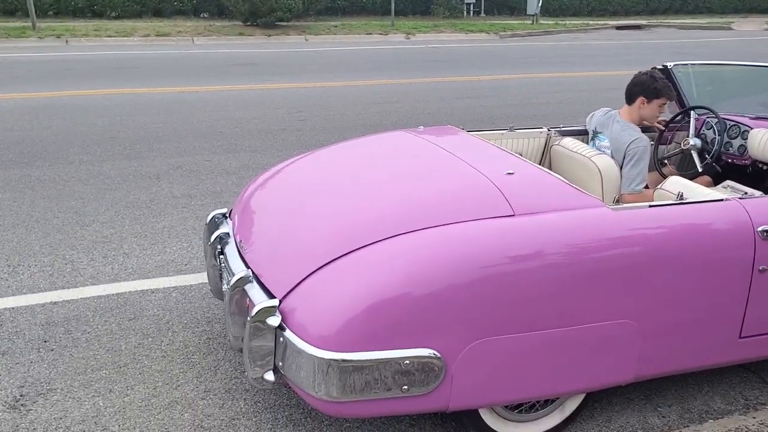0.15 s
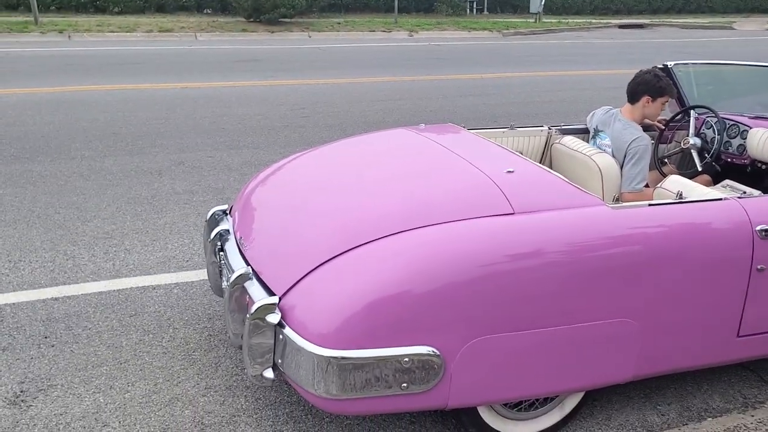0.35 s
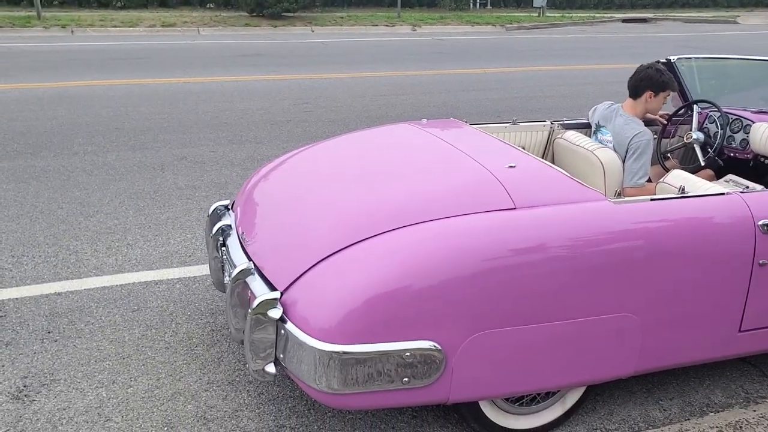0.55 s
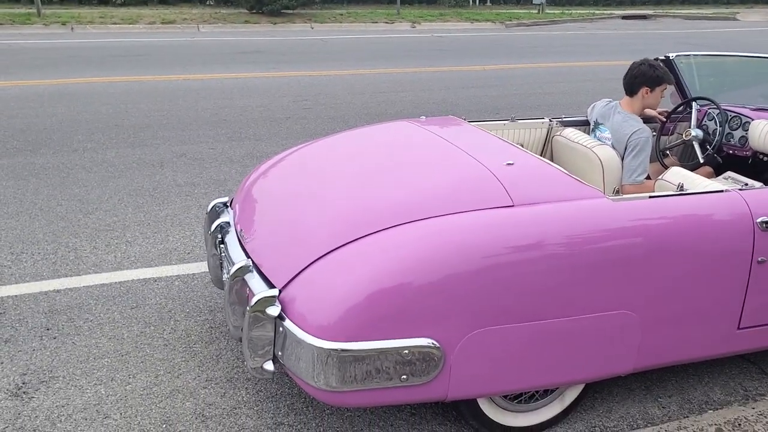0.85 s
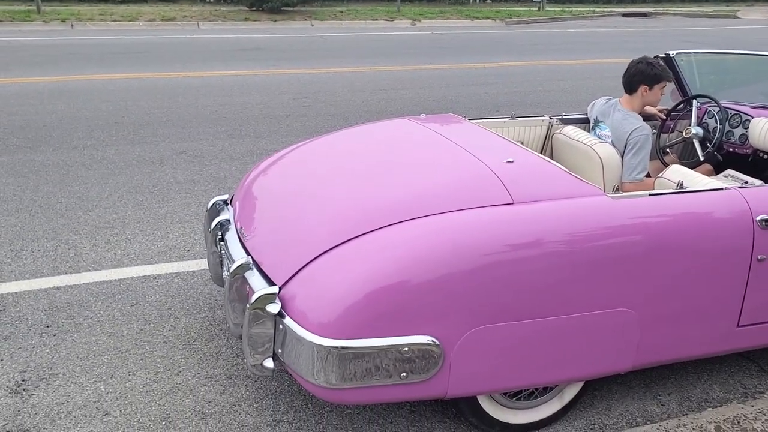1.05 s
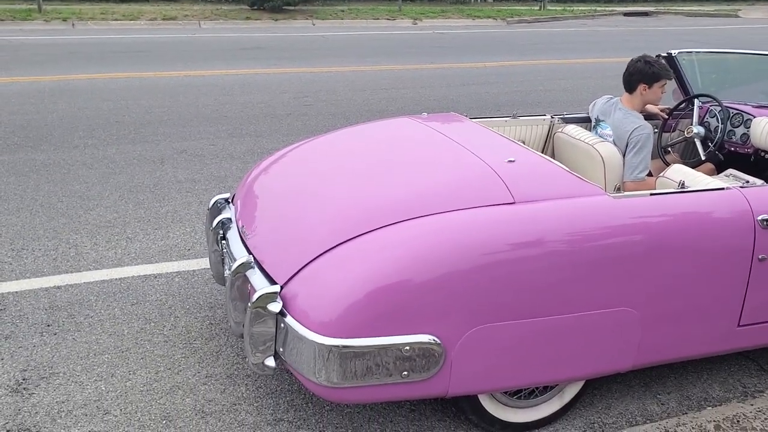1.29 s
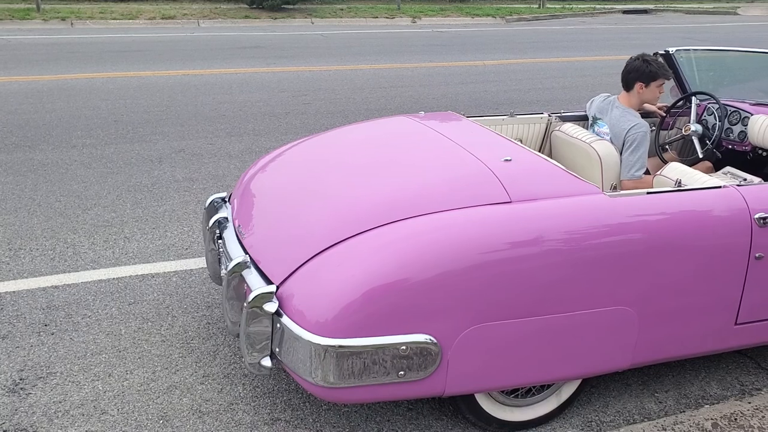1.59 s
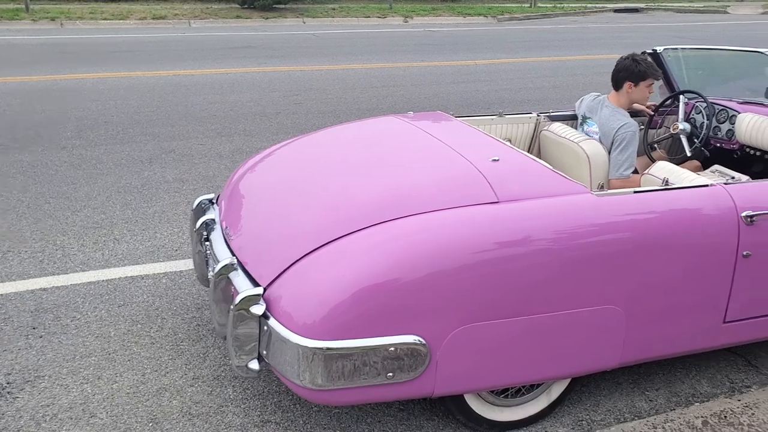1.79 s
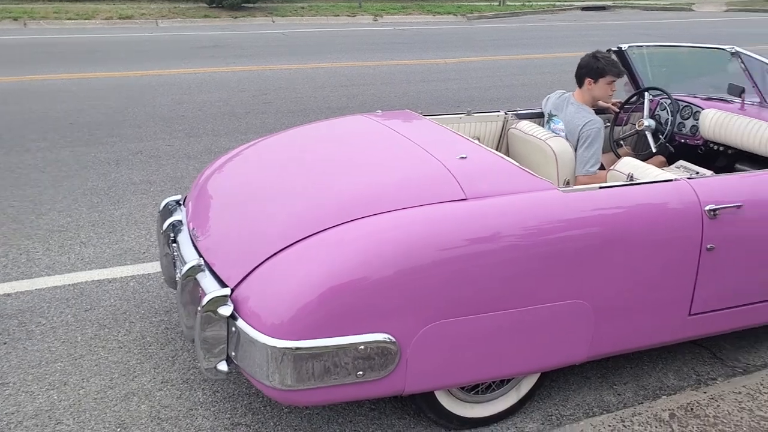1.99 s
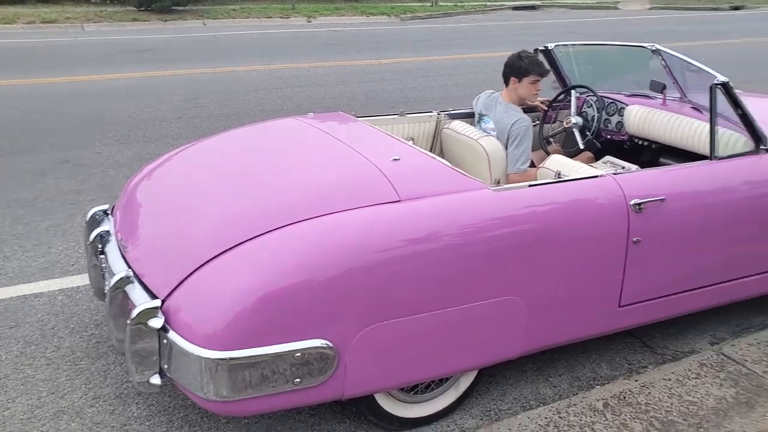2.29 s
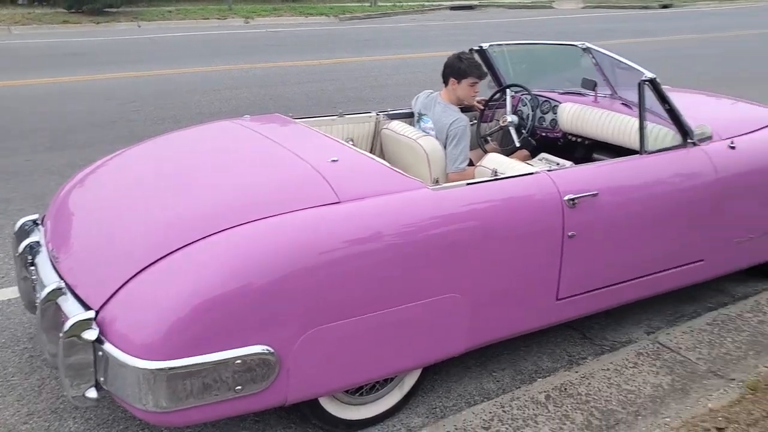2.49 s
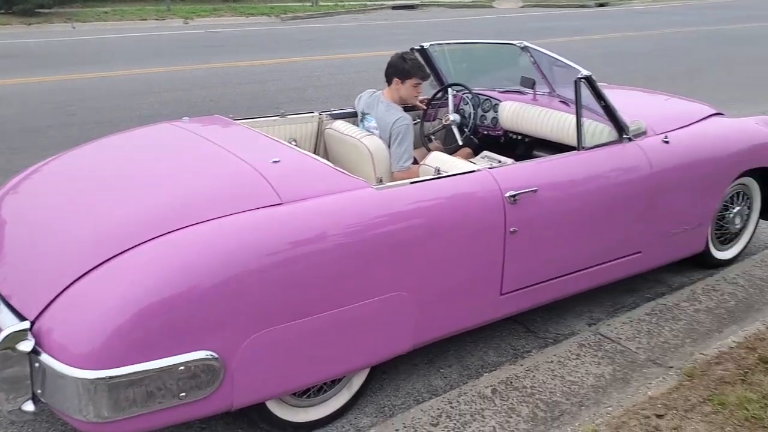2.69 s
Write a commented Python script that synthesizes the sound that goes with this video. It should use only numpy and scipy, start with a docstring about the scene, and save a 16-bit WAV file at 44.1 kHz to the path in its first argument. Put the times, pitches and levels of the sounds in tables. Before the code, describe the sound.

A parked classic car's V8 engine holds a rev, sinks to a lumpy idle, then gives two quick blips with raspy exhaust and faint pops. Heard from beside the rear wheel at a roadside, over soft traffic noise.

```python
"""A parked V8 blipped three times at a roadside, heard from behind the rear wheel.
Each bank of four fires unevenly into its own pipe: thumps, burbling gas and a tone at the firing rate.
A rasp of gas follows each thump, mostly from the near pipe, and rings the tailpipe; lone pops sound
off the throttle. Road noise lies underneath and swells at the end as a vehicle nears."""
import sys
import numpy as np
from scipy import signal
from scipy.fft import rfft, irfft
from scipy.io import wavfile
from scipy.ndimage import uniform_filter1d

SR = 44100
rng = np.random.default_rng(int(sys.argv[2]) if len(sys.argv) > 2 else 0)


def store_wav(level_fs):
    """Save 16-bit WAV to argv[1]."""
    pcm = np.round(np.clip(np.atleast_2d(level_fs), -1, 1) * 32767)
    wavfile.write(sys.argv[1], SR, pcm.T.astype(np.int16))


N = 125685
TIME_S = np.arange(N) / SR

# Engine load. Each row: time in seconds, then thump, tone, ring and hiss levels in dB before trims.
LOAD = [(0.0, -19.5, -19.5, -16, -44), (0.02, -18.5, -17.5, -25.5, -43), (0.28, -19.5, -19.5, -23.5, -40.5),
        (0.29, -21.5, -19.5, -24.5, -44), (0.71, -21, -19.5, -26.5, -42.5), (0.73, -17.5, -32, -23, -44.5),
        (0.78, -25.5, -14.5, -26, -46.5), (0.82, -21.5, -40, -37, -57), (0.86, -25.5, -34, -53.5, -60.5),
        (1.28, -45, -33.5, -57, -71.5), (1.32, -37.5, -52, -57, -70), (1.45, -28, -23.5, -33, -60),
        (1.47, -32, -43, -23.5, -46.5), (1.48, -27.5, -33, -32, -49.5), (1.57, -21.5, -18, -24, -43),
        (1.9, -20.5, -16.5, -29, -43.5), (1.92, -23, -16.5, -22, -48), (1.94, -20, -16, -27, -52.5),
        (1.97, -27.5, -29, -47, -58.5), (2.03, -33.5, -30.5, -46, -63.5), (2.18, -24, -19.5, -38.5, -49),
        (2.21, -19.5, -18, -25, -44), (2.48, -20, -14, -26.5, -43), (2.54, -24.5, -19, -42.5, -57),
        (2.64, -26, -27, -65, -70.5), (2.67, -35.5, -29, -48, -74), (2.83, -26, -35.5, -61, -76),
        (2.85, -16, -30, -45, -68)]
THUMP_COL, TONE_COL, RING_COL, HISS_COL = 1, 2, 3, 4
# Cylinders in firing order. Each row: relative thump in dB, relative rasp in dB.
CYLINDERS = [(-0.5, 1.5), (3, -7), (-2.5, -3), (1, 0.5), (0, -12), (-0.5, -2), (-1, -8.5), (-0.5, -10)]


def amp(db):
    return 10 ** (np.asarray(db) / 20)


def unit_rms(x):
    return x / np.sqrt(np.mean(x ** 2) + 1e-20)


def at_hz(points, hz):
    """Interpolate (Hz, value) rows over log frequency."""
    point_hz, value = np.transpose(points)
    return np.interp(np.log(hz + 1), np.log(point_hz + 1), value)


def load_db(column):
    """One load column at every sample."""
    columns = np.transpose(LOAD)
    return np.interp(TIME_S, columns[0], columns[column])


def coloured(x, spectrum):
    """Minimum-phase filter from (Hz, dB) rows."""
    log_gain = np.log(amp(at_hz(spectrum, abs(np.fft.fftfreq(16384, 1 / SR)))))
    taps = np.fft.ifft(np.exp(np.conj(signal.hilbert(log_gain)))).real[:6000]
    return signal.oaconvolve(np.atleast_2d(x), taps[None], axes=1)[:, :N]


def resonate(x, hz, width_hz):
    """Two-pole resonance, near unity gain at its peak."""
    radius, angle = np.exp(-np.pi * width_hz / SR), 2 * np.pi * hz / SR
    poles = [1, -2 * radius * np.cos(angle), radius ** 2]
    return 2 * (1 - radius) * np.sin(angle) * signal.lfilter([1], poles, x)


def clicks(times_s, sizes):
    return np.bincount(np.clip(np.round(times_s * SR).astype(int), 0, N - 1), sizes, N)


def puffs(times_s, sizes, rise_s, fall_s):
    """A short envelope at each time."""
    t = np.arange(0, .1, 1 / SR)
    envelope = (1 - np.exp(-t / rise_s)) * np.exp(-t / fall_s)
    return abs(signal.oaconvolve(clicks(times_s, sizes), envelope)[:N])


def levelled(x, db):
    """Hold the running RMS to a level curve, whatever the firing rate."""
    power = uniform_filter1d(uniform_filter1d((x ** 2).mean(0), 6000), 6000)
    return amp(db) * x / np.sqrt(power + 1e-12)


def stereo_noise():
    """White noise, alike on both sides in the bass and apart in the treble."""
    # Each row: frequency in Hz, left-right correlation.
    correlation = [(60, 0.85), (180, 0.66), (550, 0.91), (1650, 0.17), (4970, 0.53), (15000, 0.31)]
    left, other = rfft(rng.standard_normal((2, N)), axis=1)
    shared = at_hz(correlation, np.fft.rfftfreq(N, 1 / SR))
    right = shared * left + np.sqrt(1 - shared ** 2) * other
    return irfft(np.array([left, right]), N, axis=1)


def road_noise():
    """Distant traffic wash, and a vehicle drawing near."""
    # Noise spectra. Each row: frequency in Hz, relative level in dB.
    wash_spectrum = [(18, -22), (30, -30), (59, -3), (90, 0.5), (457, -28), (835, -28.5), (1880, -33.5),
                     (4960, -47), (10100, -56), (11200, -46), (15700, -57)]
    car_spectrum = [(100, -39), (300, 1), (700, 5), (1200, -7), (2500, -33), (6000, -51)]
    wash_db, car_end_db, rise_db_per_s = -30, -37, 46
    wash = amp(wash_db) * unit_rms(coloured(stereo_noise(), wash_spectrum))
    car_db = car_end_db - rise_db_per_s * (N / SR - TIME_S)
    return wash + amp(car_db) * unit_rms(coloured(stereo_noise(), car_spectrum))


def reflections(x, level_db, t60_s):
    """Kerb, road and bodywork scatter the sound, differently for each side."""
    delay_s = np.arange(60, 8000) / SR
    shape = (2, len(delay_s))
    taps = rng.choice([-1., 1.], shape) * (rng.random(shape) < .05) * amp(-60 * delay_s / t60_s)
    taps /= np.linalg.norm(taps, axis=1)[:, None]
    return amp(level_db) * signal.oaconvolve(x, taps, axes=1)[:, :N]


def crank_firings():
    """Running count of firings, four to a turn."""
    # Each row: time in seconds, engine speed in rpm.
    speed = [(0.0, 1207.0), (0.25, 1266.0), (0.76, 1256.0), (1.05, 672.0), (1.25, 540.0), (1.4, 532.0),
             (1.6, 947.0), (1.8, 1228.0), (1.92, 1083.0), (2.1, 746.0), (2.2, 860.0), (2.4, 1182.0),
             (2.5, 1031.0), (2.62, 798.0), (2.85, 630.0)]
    start_count = -2.15
    firing_hz = np.interp(TIME_S, *np.transpose(speed)) * 4 / 60
    return start_count + np.cumsum(firing_hz) / SR


def firings():
    """Time and cylinder of each firing."""
    count = crank_firings()
    number = np.arange(np.ceil(count[0]), count[-1])
    return np.interp(number, count, TIME_S), number.astype(int) % len(CYLINDERS)


def gas_bursts(times_s, sizes, steady_hiss):
    """Gas noise as broad hiss and as tailpipe rings, which each burst excites differently."""
    # Tailpipe modes. Each row: frequency in Hz, width in Hz, gain in dB.
    modes = [(1322, 41.5, -2.5), (1672, 130, -1.5), (1969, 130, -2.5), (2160, 86, -8.5), (2657, 63, -1.5),
             (2960, 106, -2), (3363, 360, -8.5), (4560, 440, -13.5)]
    # Spectra of the hiss and of the band around the rings. Each row: frequency in Hz, gain in dB.
    hiss_spectrum = [(320, -40), (550, -1.5), (738, -16), (803, -3.5), (1490, -9), (1690, 0), (2330, -4),
                     (3000, -4.5), (4970, -21.5), (5410, -16.5), (9740, -29.5), (13800, -21), (15700, -34)]
    ring_band = [(600, -36), (1200, -2.5), (3500, 1.5), (6000, -16), (15000, -47)]
    rise_s, spread_db = 0.0012, 6.5
    drive_db = spread_db * rng.standard_normal((len(times_s), len(modes)))
    gas = stereo_noise()
    envelope = unit_rms(puffs(times_s, sizes, rise_s, fall_s=0.0046)) + steady_hiss
    hiss = coloured(envelope * stereo_noise(), hiss_spectrum)
    rings = 0
    for k, (hz, width_hz, db) in enumerate(modes):
        drive = puffs(times_s, sizes * amp(drive_db[:, k]), rise_s, fall_s=0.0076)
        rings += amp(db) * resonate(drive * gas, hz, width_hz)
    return unit_rms(hiss), unit_rms(coloured(rings, ring_band))


def overrun_pops():
    """Lone gas bursts while the engine coasts."""
    # Each row: start in seconds, relative peak in dB.
    pops = [(1.052, -23), (1.246, -30), (1.258, -34), (1.306, -28), (1.385, -21.5), (1.416, -29),
            (1.4407, -19), (2.084, -17), (2.1, -21.5), (2.1555, -12), (2.183, -19), (2.556, -44)]
    hiss_rms_db, ring_rms_db = -57, -51
    times_s, peak_db = np.transpose(pops)
    hiss, rings = gas_bursts(times_s, amp(peak_db), steady_hiss=0)
    return amp(hiss_rms_db) * hiss + amp(ring_rms_db) * rings


def exhaust_rasp(times_s, cylinder):
    """A gas burst at every firing, strongest from the near bank."""
    uneven_db, hiss_trim_db, ring_trim_db = 1.2, 16, -1
    sizes = amp(np.transpose(CYLINDERS)[1][cylinder] + uneven_db * rng.standard_normal(len(times_s)))
    hiss, rings = gas_bursts(times_s, sizes, steady_hiss=amp(-4))
    hiss = levelled(hiss, load_db(HISS_COL) + hiss_trim_db)
    return hiss + levelled(rings, load_db(RING_COL) + ring_trim_db)


def firing_tone():
    """Both pipes add up at the firing rate."""
    trim_db, lead_cycles = -2, 0.13
    phase_rad = 2 * np.pi * (crank_firings() + lead_cycles)
    return amp(load_db(TONE_COL) + trim_db) * np.sqrt(2) * np.cos(phase_rad)


def exhaust_thumps(times_s, cylinder):
    """Pressure pulses of both banks with turbulent gas behind each; lumpier off the throttle."""
    # Spectra of the two pipes and the burbling gas. Each row: frequency in Hz, gain in dB.
    near_pipe = [(20, -47), (40, -9), (60, -16), (85, 0), (120, 2.5), (160, -7.5), (210, -1.5), (280, -11),
                 (350, -7), (430, -9.5), (550, -23), (800, -27.5), (1500, -27), (4000, -91)]
    far_pipe = [(20, -37.5), (45, -2), (80, 2), (140, -7), (220, -8), (350, -15), (500, -27), (1200, -48.5),
                (4000, -73)]
    burble_spectrum = [(40, -32.5), (100, -11), (210, -2), (280, -8.5), (350, -2), (430, -6.5), (550, -16),
                       (900, -22.5), (1500, -35.5), (4000, -72.5)]
    lead_s, far_lag_s, jitter_s = 0.00302, 0.0021, 0.00041
    idle_below_db, burble_db = -28, -6
    level_db = load_db(THUMP_COL)
    size_draw, time_draw = rng.standard_normal((len(times_s), 2)).T
    uneven_db = np.where(level_db[(times_s * SR).astype(int)] < idle_below_db, 5, 1.5)
    sizes = amp(np.transpose(CYLINDERS)[0][cylinder] + uneven_db * size_draw)
    starts_s = times_s - lead_s + jitter_s * time_draw
    near_bank = np.isin(cylinder, [0, 2, 3, 5])
    near = coloured(clicks(starts_s, sizes * near_bank), near_pipe)
    far = coloured(clicks(starts_s + far_lag_s, sizes * ~near_bank), far_pipe)
    turbulence = puffs(starts_s, sizes, rise_s=0.0014, fall_s=0.013) * stereo_noise()
    burble = coloured(turbulence, burble_spectrum)
    return levelled(unit_rms(near + far) + amp(burble_db) * unit_rms(burble), level_db)


def scene():
    """Engine, reflections and road, with phase and level offsets between the sides."""
    # Each row: frequency in Hz, phase lead of the left side in radians.
    left_lead = [(0, 0.085), (60, 0.22), (400, 0.014), (1380, 0.91), (3360, 0.48), (15000, 1.84)]
    # Each row: frequency in Hz, left minus right level in dB.
    balance = [(60, 0.5), (180, 1.5), (550, -2.5), (1650, 3), (4970, 1), (15000, -1)]
    times_s, cylinder = firings()
    engine = exhaust_thumps(times_s, cylinder) + firing_tone()
    engine += exhaust_rasp(times_s, cylinder) + overrun_pops()
    mix = engine + reflections(engine, level_db=-12.5, t60_s=0.16) + road_noise()
    hz, side = np.fft.rfftfreq(N, 1 / SR), np.array([[.5], [-.5]])
    side_gain = np.exp(1j * side * at_hz(left_lead, hz)) * amp(side * at_hz(balance, hz))
    return irfft(rfft(mix, axis=1) * side_gain, N, axis=1)


def record(dry):
    """Steep low-pass."""
    cutoff_hz = 15700
    taps = signal.firwin(511, cutoff_hz, window=("kaiser", 9), fs=SR)
    return signal.oaconvolve(dry, taps[None], "same")


dry = scene()
out = record(dry)
store_wav(out)
```